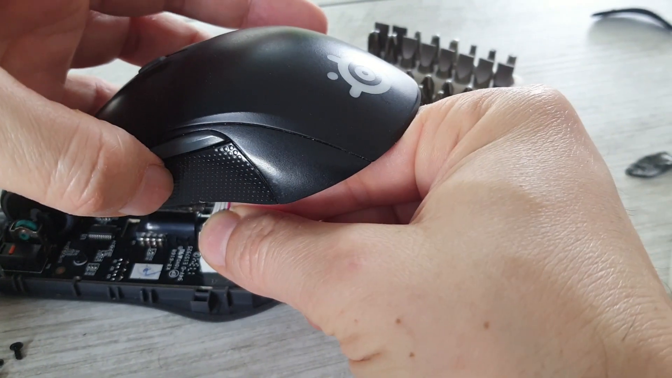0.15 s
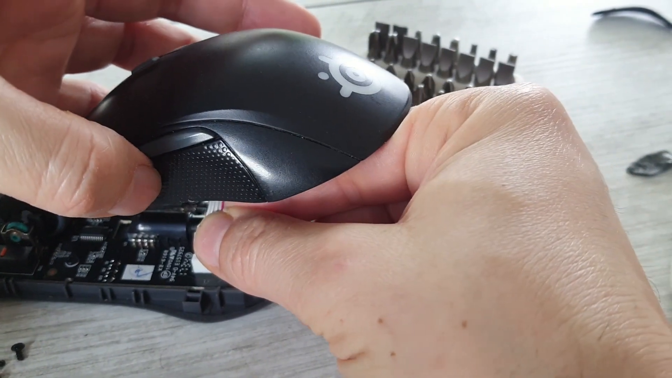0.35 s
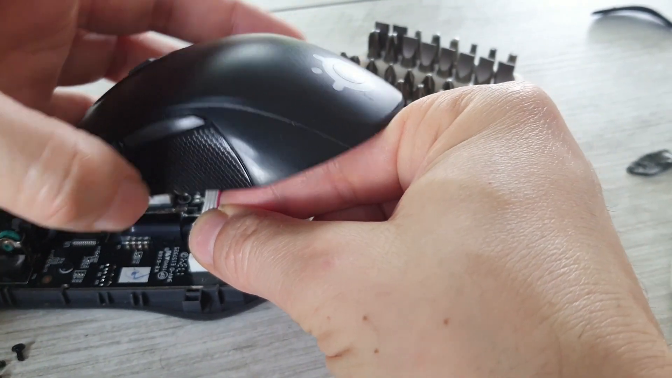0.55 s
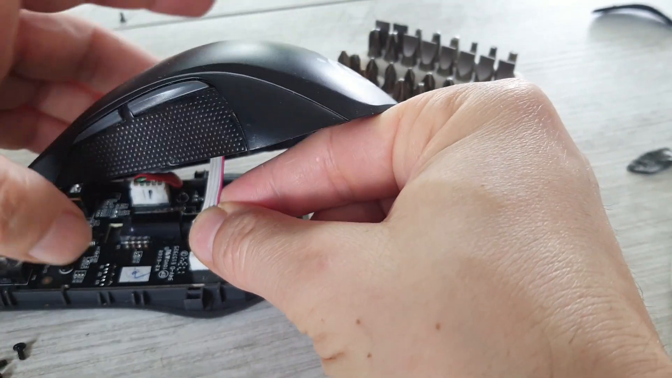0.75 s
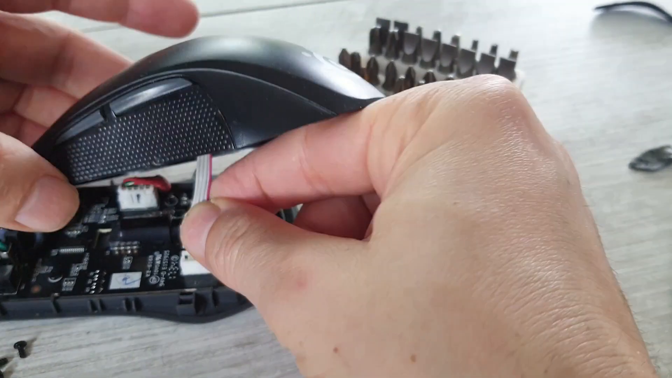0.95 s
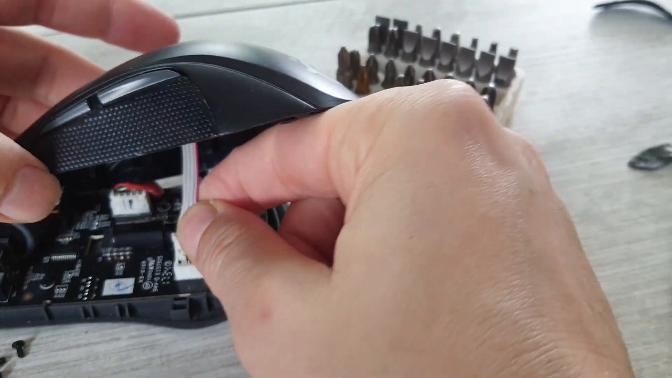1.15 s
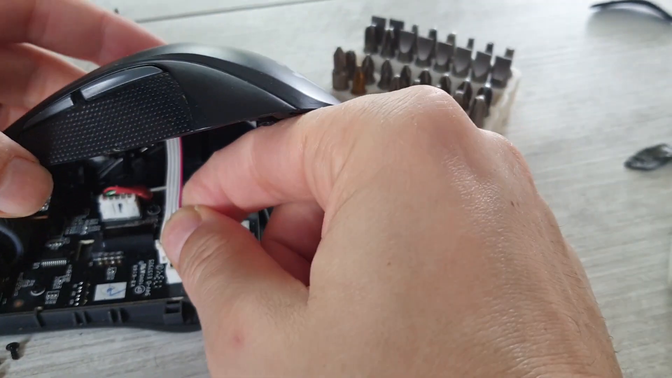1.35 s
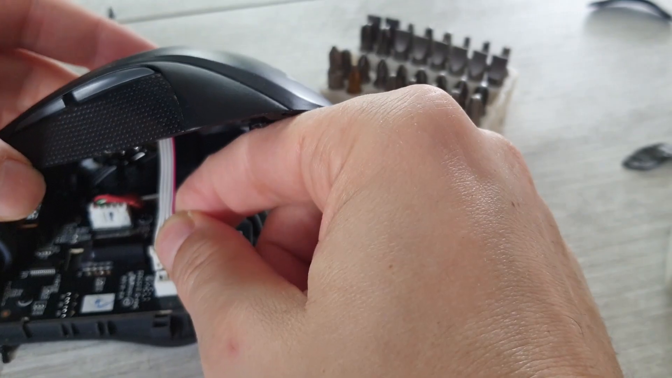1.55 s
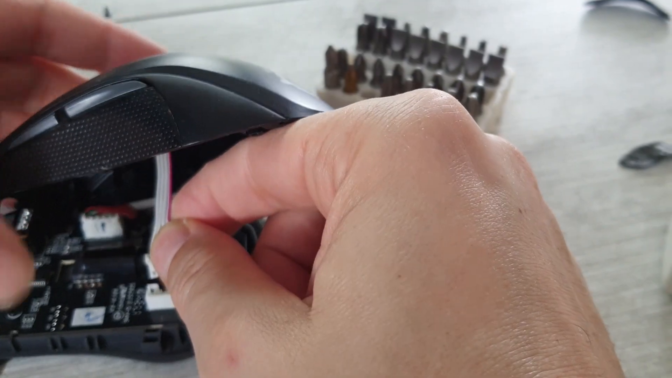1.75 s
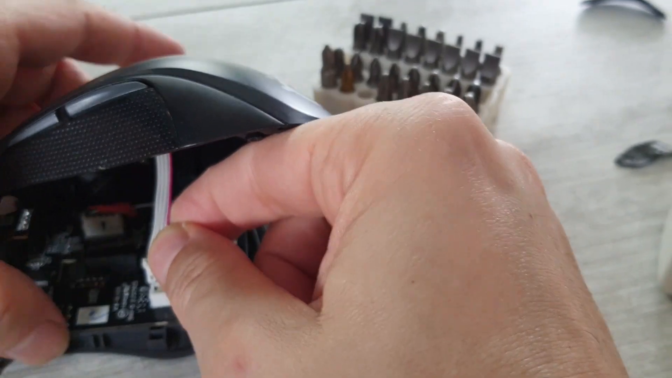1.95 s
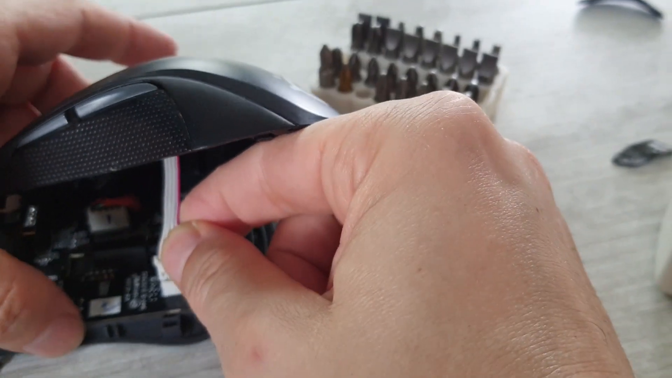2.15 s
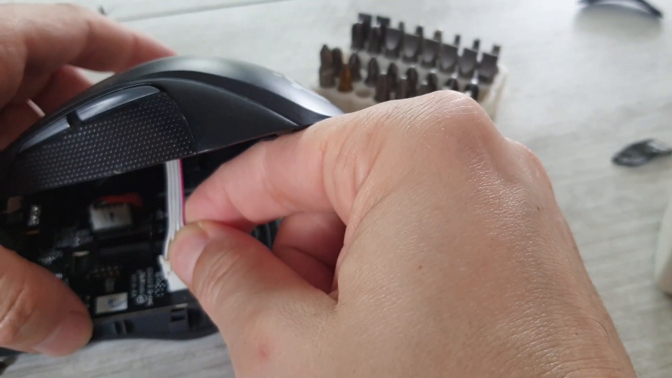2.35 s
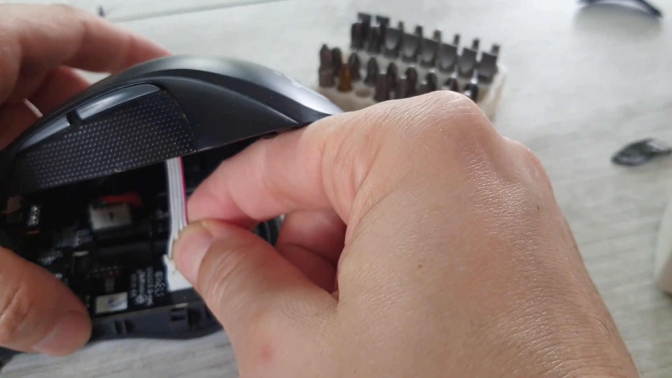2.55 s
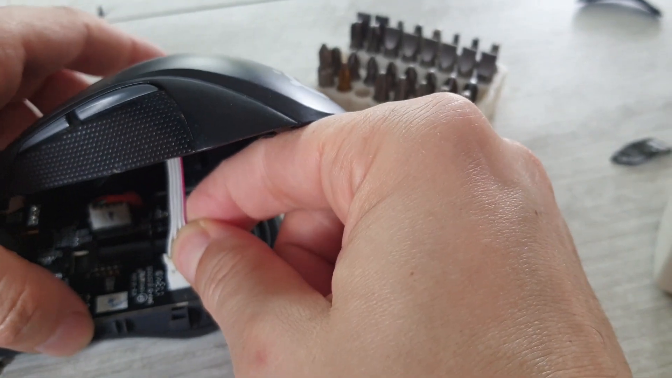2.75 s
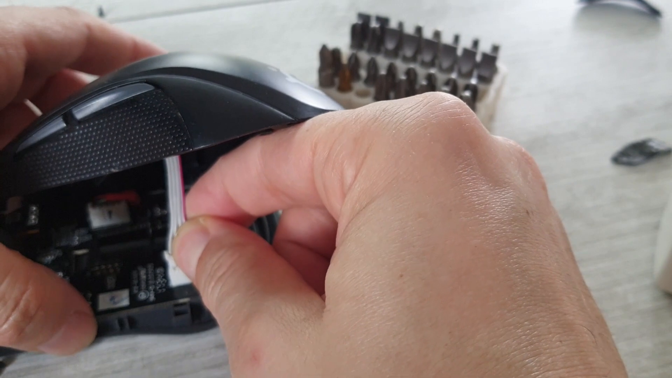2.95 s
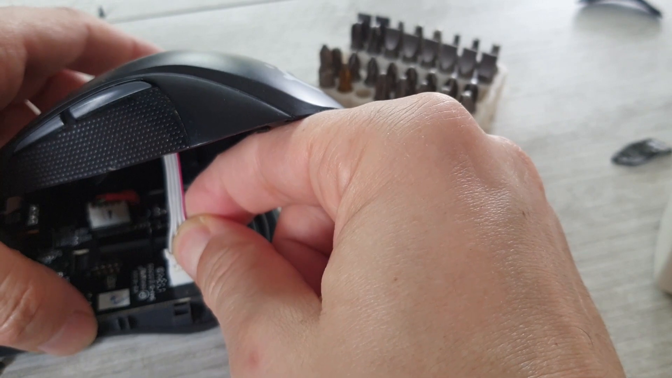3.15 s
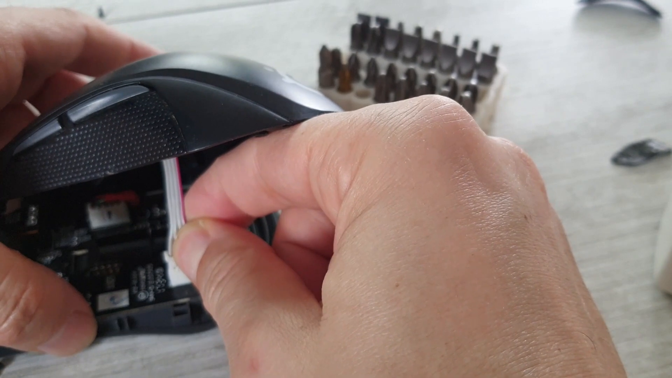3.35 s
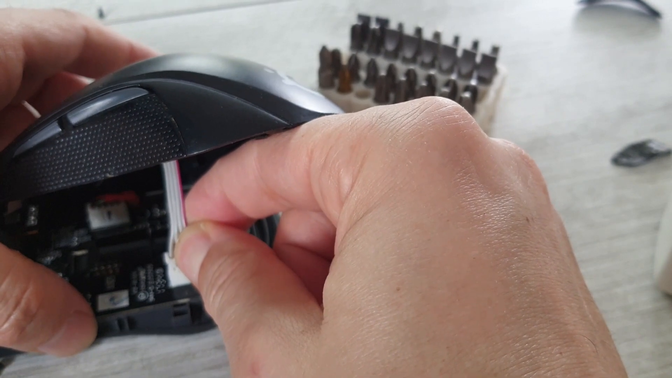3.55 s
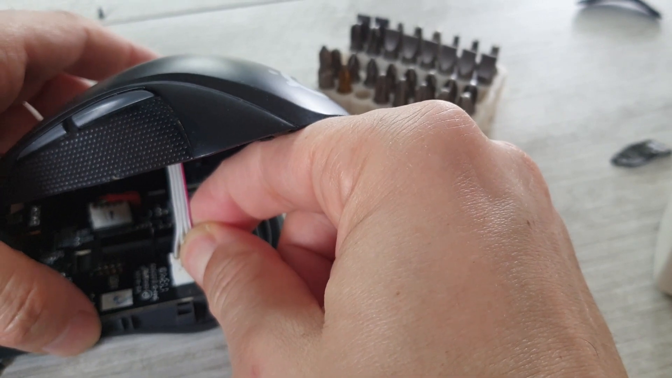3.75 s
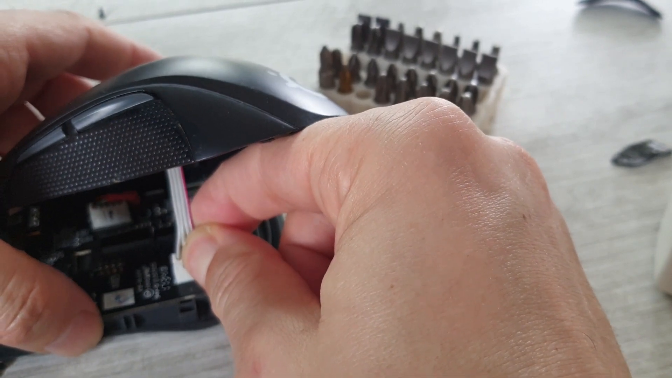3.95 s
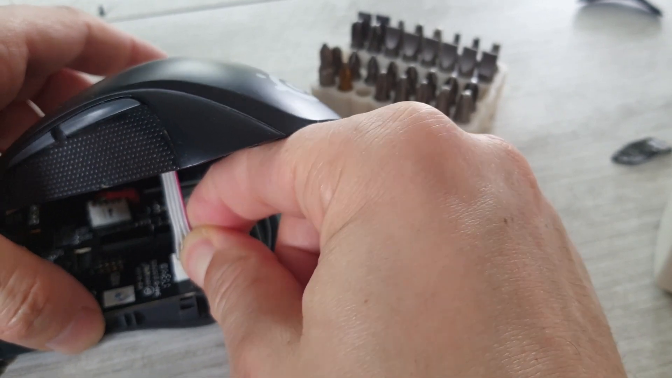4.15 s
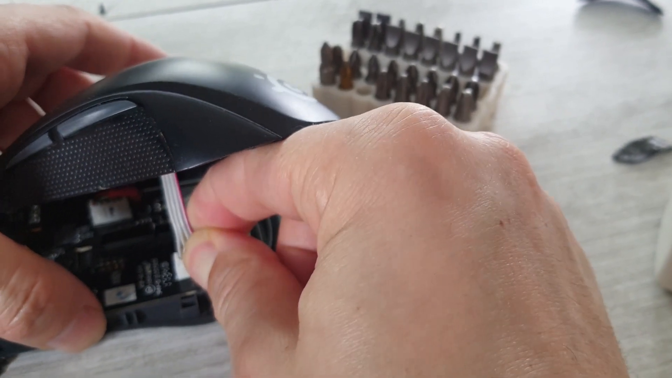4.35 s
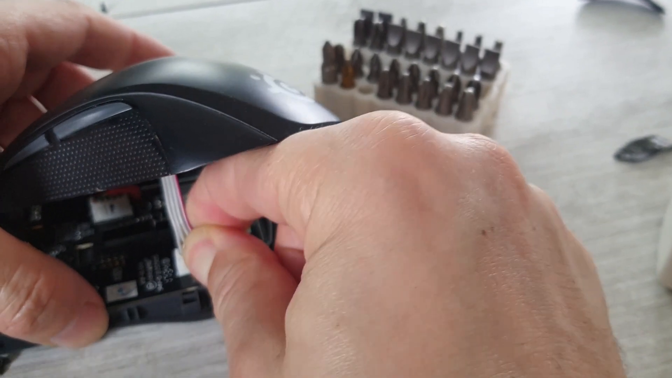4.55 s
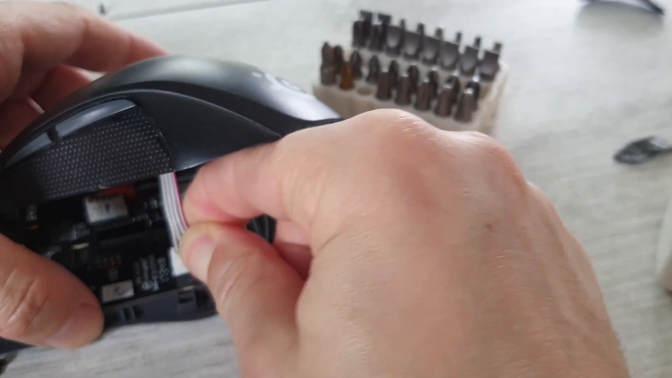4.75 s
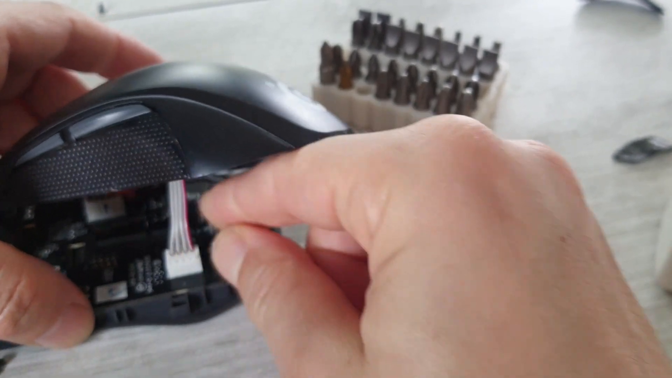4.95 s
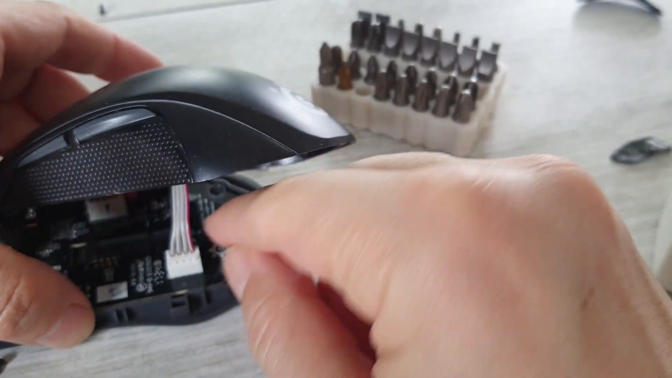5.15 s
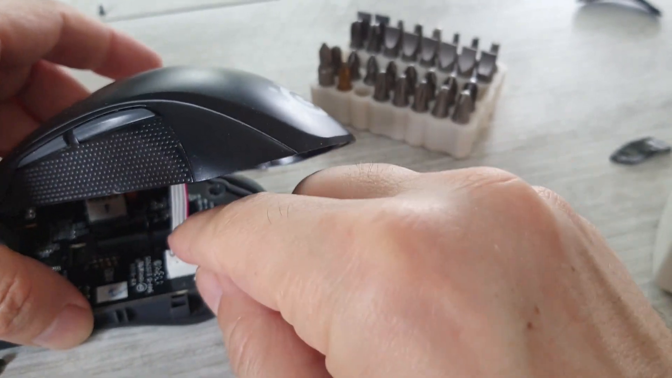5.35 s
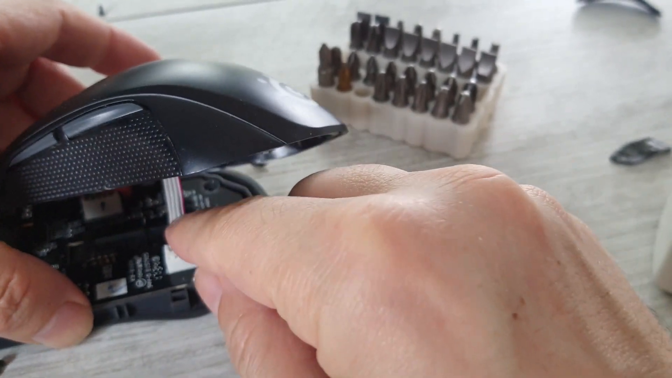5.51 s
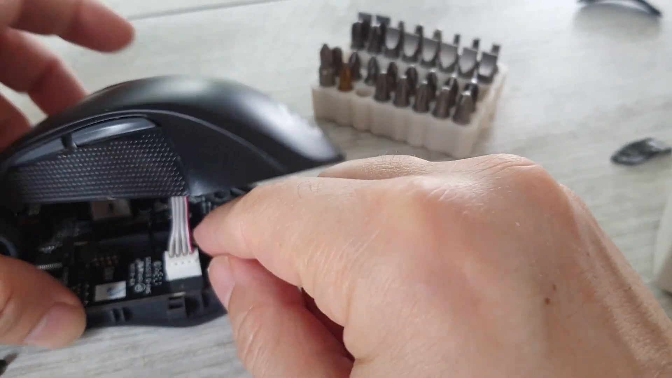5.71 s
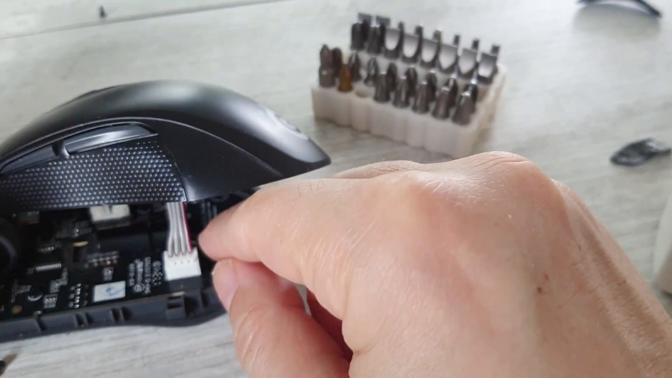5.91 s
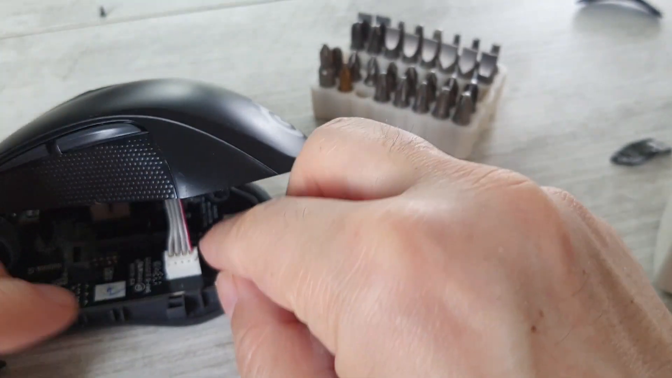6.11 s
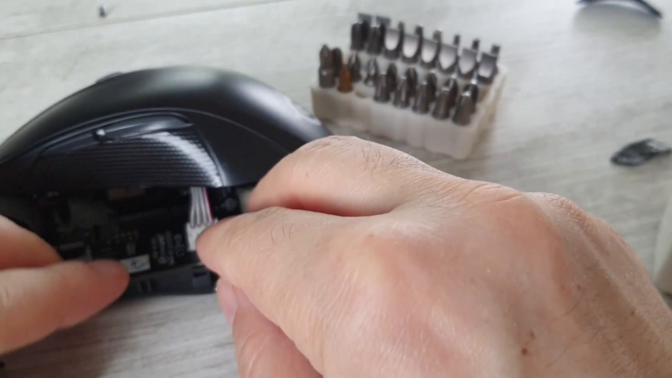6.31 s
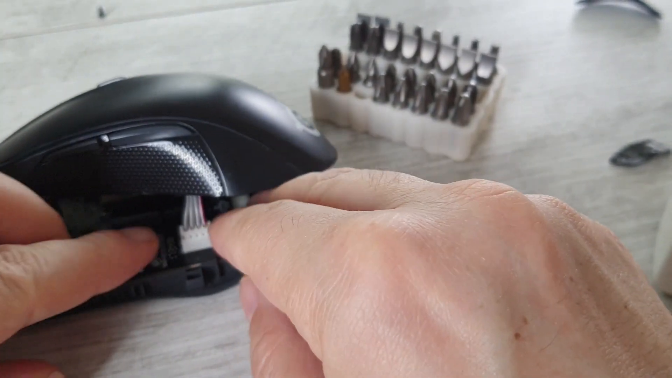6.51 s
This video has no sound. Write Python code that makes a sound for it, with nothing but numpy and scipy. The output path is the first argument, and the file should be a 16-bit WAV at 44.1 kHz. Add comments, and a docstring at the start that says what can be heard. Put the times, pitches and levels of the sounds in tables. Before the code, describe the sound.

Light hollow plastic clicks and taps of a mouse shell being handled on a desk, sparse at first, ending in a loud sharp clatter.

```python
"""Plugging a cable into an opened computer mouse

Fingers press a cable plug into an opened plastic mouse on a wooden desk, close to a camera.
The shell taps on its base: bursts of tiny impacts ring the plastic, its hollows and the desk, and edges tick.
Skin rubs the plastic as coloured noise, the shell scrapes, and the desk thuds, hums and rumbles.
Near the end the hand lands and the parts clatter. Soft noise makes the quiet room tone and hiss behind."""
import sys
import numpy as np
from scipy import signal
from scipy.fft import rfft, irfft, next_fast_len
from scipy.io import wavfile
from scipy.ndimage import uniform_filter1d, map_coordinates

SR = 44100
rng = np.random.default_rng(int(sys.argv[2]) if len(sys.argv) > 2 else 0)


def int16_out(signal):
    """Quantize to a 16-bit WAV file."""
    q = np.round(np.clip(np.atleast_2d(signal).T, -1, 1) * 32767)
    wavfile.write(sys.argv[1], SR, q.astype(np.int16))


N = 294386  # length in samples
STEADY_TOP_HZ = 15800  # skin rub and room tone stop here


def amp(db):
    """Turn decibels into gain."""
    return 10 ** (np.asarray(db) / 20)


def unit(x):
    """Scale a sound to an rms of 1."""
    return x / np.sqrt(np.mean(x ** 2) + 1e-20)


def along(points, hz):
    """Read a value between (frequency, value) points on a log frequency axis."""
    f, value = np.transpose(points)
    return np.interp(np.log(hz + 1), np.log(f + 1), value)


def curve(rows):
    """Join (time, value) points with straight lines, one value per sample."""
    return np.interp(np.arange(N) / SR, *np.transpose(rows))


def wobble(rate):
    """A smooth random curve with this many random points a second."""
    points = rng.standard_normal(int(N * rate / SR) + 4)
    return map_coordinates(points, [np.arange(N) * rate / SR])


def filtered(x, response):
    """Multiply the spectrum of x by a response, which may be complex."""
    m = next_fast_len(N + SR // 2)
    hz = np.fft.rfftfreq(m, 1 / SR)
    return irfft(rfft(x, m) * response(hz), m)[..., :N]


def white():
    """Plain random noise, one channel."""
    return rng.standard_normal(N)


def noise(spectrum):
    """Noise coloured by a spectrum, with an rms of 1."""
    return unit(filtered(white(), lambda hz: amp(along(spectrum, hz))))


def body(modes):
    """An object rings at several resonances, added with alternating sign."""
    def response(f):
        total = 0
        for k, (centre, width, db) in enumerate(modes):
            damping = 1j * f * width
            total = total + (-1) ** k * amp(db) * damping / (centre ** 2 - f ** 2 + damping)
        return total
    return response


# resonances of the shell's edges: (frequency [Hz], width [Hz], relative level [dB])
EDGE_MODES = [(3110, 230, 7.5), (3890, 58, 10.5), (4380, 330, 6), (7130, 980, 2.5), (8700, 900, -2),
              (11870, 4200, -5.5)]
# resonances of the shell's walls: (frequency [Hz], width [Hz], relative level [dB])
WALL_MODES = [(1060, 170, -5), (1280, 170, -4), (1515, 130, 0), (1740, 150, -4), (1910, 130, -2),
              (2450, 300, -9)]
# resonances of the upper shell hollow: (frequency [Hz], width [Hz], relative level [dB])
UPPER_MODES = [(548, 71, -11.5), (606.5, 51.5, -4.5), (668, 120, -13)]
# resonances of the lower shell hollow: (frequency [Hz], width [Hz], relative level [dB])
LOWER_MODES = [(236, 129, -5.5), (324.5, 40, 9), (398, 31, -9.5)]
# resonances of the desk under a blow: (frequency [Hz], width [Hz], relative level [dB])
DESK_MODES = [(73.7, 20.2, 0.5), (124.3, 21.3, 4.5), (163, 68, -8)]
# size of the first blow against the chatter: one ratio each for edges, walls, upper, lower hollow, desk
FIRST_BLOW = [0.19, 0.51, 0.82, .7, 1.66]


def chattering_blows(blows, spiky_db=7, apart=.8):
    """A blow, then a dying chatter of tiny impacts, makes the edges, walls, hollows and desk ring."""
    out = np.zeros((2, N + SR))
    t = np.arange(2 ** 13) / SR
    hz = np.fft.rfftfreq(len(t), 1 / SR)
    all_modes = (EDGE_MODES, WALL_MODES, UPPER_MODES, LOWER_MODES, DESK_MODES)
    bodies = np.array([body(modes)(hz) for modes in all_modes])
    for start, gains, length in blows:
        fade = np.exp(-(t / np.clip(length, .001, .05)) ** 1.5)
        rise = 1 - np.exp(-t / (0.059 * length))  # a long chatter starts softly
        impacts = amp(spiky_db * rng.standard_normal(len(t))) * rise * fade
        shared = rng.standard_normal((5, 1, len(t)))
        own = rng.standard_normal((2, len(t)))
        chatter = np.repeat(shared, 2, axis=1)
        chatter[0] += apart * own  # edges rattle at many points, so the two ports hear them differently
        chatter *= impacts / np.linalg.norm(impacts)
        chatter[..., 0] += np.array(FIRST_BLOW)[:, None]
        rings = irfft(rfft(chatter) * bodies[:, None], len(t))
        peaks = np.abs(rings).max(axis=(1, 2))
        rings *= (gains / peaks)[:, None, None]
        first = round(start * SR)
        out[:, first:first + len(t)] += rings.sum(axis=0)
    return out[:, :N]


def snaps(touches, cycles=6, lag=90):
    """Each touch gives a rough, high-pitched snap, 90 samples late, that dies within a few cycles."""
    out = np.zeros((2, N + SR))
    t = np.arange(2 ** 13) / SR
    for start, db, pitch_hz in touches:
        rough = uniform_filter1d(rng.standard_normal((2, len(t))), size=4)  # spreads it around its pitch
        snap = np.sin(2 * np.pi * pitch_hz * t) * (1 + 2.88 * rough)
        snap *= amp(db) * np.exp(-t * pitch_hz / cycles)
        first = round(start * SR)
        out[:, first:first + len(t)] += np.roll(snap, lag, axis=1)
    return out[:, :N]


# the shell knocks on its base: (time [s], peak level in the lower hollow [dB],
# upper hollow over that [dB], edge rattle over that [dB], chatter length [s])
KNOCKS = [(0.604, -62, -12, 8, 0.03), (0.62, -35.5, -10, -1.5, 0.015), (0.6384, -28.5, -13.5, -9.5, 0.014),
          (.645, -41, -14, -4, 0.039), (.832, -50, -9, -3, 0.019), (0.842, -54.5, -5, 8.5, .027),
          (0.865, -40, -14, -4.5, 0.011), (.896, -44.5, -8.5, -7.5, 0.04), (.963, -43, -0.5, -22, 0.014),
          (1.0788, -33, -9, -6.5, 0.023), (1.1165, -35, -19, -14, 0.064), (1.148, -44.5, -23, -2, 0.065),
          (1.6316, -31.5, -10.5, -20.5, 0.021), (1.708, -35, -33, -14.5, 0.028),
          (1.72, -34.5, -10.5, -22, 0.038), (1.8958, -31, -13, -30, .011), (1.902, -38, 3, -7, 0.012),
          (1.913, -41.5, 9, -24, 0.0057), (1.9173, -44, 5, -23, 0.048), (1.936, -42.5, 3, -6, 0.041),
          (1.9865, -43.5, 2.5, -11, 0.0098), (2.038, -43, -4, -22, 0.026), (2.169, -40.5, -6.5, -14, 0.034),
          (2.1985, -38, -6, -34, 0.027), (3.04, -64, 4, 10, 0.015), (3.071, -55.5, 2.5, -2, 0.054),
          (3.682, -42.5, -1, -17, 0.027), (3.818, -57.5, 1.5, -7, 0.014), (3.8968, -43, 0.5, -9, 0.0073),
          (3.904, -46.5, -3, -21, 0.045), (3.922, -45, -5.5, -14, 0.037), (4.0464, -55, -3, -3, 0.013),
          (4.087, -50.5, -17, -3.5, 0.066), (4.14, -45.5, -24, -13, 0.033), (4.3284, -53.5, -10, -5, 0.027),
          (4.666, -54.5, 0, -3, 0.044), (4.74, -47, -22, -30, 0.048), (4.816, -45.5, -10, -5, 0.047),
          (4.845, -31, -7, -12, 0.015), (4.893, -40.5, -6, -12, 0.072), (5.0096, -49.5, -3.5, -8, 0.02),
          (5.577, -75, -6, -4, .03), (5.613, -58, -7, 4, 0.021), (5.6467, -29, -24, -15.5, 0.027),
          (5.7422, -25, -11, -31, 0.018), (5.7667, -35, -9, -10, .015), (5.802, -34, -26, -23, .021),
          (5.828, -36, -24, -18, 0.023), (5.911, -42.5, 0, 12.5, 0.036), (6.107, -59, 11, -10, 0.0095),
          (6.1645, -30, -6, -4, 0.02), (6.1974, -21.5, 3.5, 2.5, .015), (6.211, -25.5, 3, 8, 0.016),
          (6.2803, -24.5, -3, -7.5, 0.022), (6.3055, -21, -0.5, 9, .021), (6.319, -37, 9.5, -13, 0.01),
          (6.3277, -20, -6.5, -26, 0.025), (6.4044, -20, 5.5, 7.5, .0081), (6.4103, -36.5, 7, 24.5, 0.011),
          (6.4398, -30.5, -8, 1.5, 0.029), (6.47, -47, -10, 9, .045), (6.514, -35, -2, -10, 0.013),
          (6.53, -33, -3.5, -3, 0.023), (6.6347, -49.5, 15.5, 19, 0.01), (6.657, -36.5, 2.5, -13, 0.033)]
WALL_DB, WALL_FROM_DB = -45.5, -41.5  # wall ring when edges and upper hollow average the second level
WALL_GROWS = 1.25  # dB of wall ring gained per dB of that average
SNAP_DB, SNAP_HZ = -7, 3674  # snap over the edge rattle, and its pitch
KNOCK_THUD_DB = -11  # desk over the lower hollow


def shell_knocks():
    """The hollow shell hits its base: a bright snap and a chatter that rings every part."""
    blows, touches = [], []
    for start, lower_db, upper_over_db, edge_over_db, length in KNOCKS:
        edge_db = lower_db + edge_over_db
        upper_db = lower_db + upper_over_db
        wall_db = WALL_DB + WALL_GROWS * ((edge_db + upper_db) / 2 - WALL_FROM_DB)
        desk_db = lower_db + KNOCK_THUD_DB
        blows.append((start, amp([edge_db, wall_db, upper_db, lower_db, desk_db]), length))
        touches.append((start, edge_db + SNAP_DB, SNAP_HZ))
    return chattering_blows(blows) + snaps(touches)


# extra wall ring where knocks catch the side wall: (time [s], peak level [dB], chatter length [s])
WALL_RING = [(1.078, -45.5, 0.036), (1.63, -49, 0.037), (1.9173, -53, 0.025), (3.902, -44.5, 0.0063),
             (4.0466, -43, 0.01), (4.097, -53, 0.056), (4.137, -58, .031), (4.331, -58, 0.016),
             (4.664, -45.5, 0.033), (4.888, -51, 0.031), (5.008, -51, 0.012), (5.641, -46, 0.02),
             (5.914, -31.5, 0.017), (6.2818, -24.5, 0.017), (6.3154, -15, 0.014), (6.4034, -7, 0.0062),
             (6.526, -28.5, .02), (6.6318, -24, 0.0096), (6.658, -38, .018)]


def extra_wall_ring():
    """Some knocks catch the side wall, which adds more wall ring."""
    walls = np.array([0, 1, 0, 0, 0])
    return chattering_blows([(start, amp(db) * walls, length) for start, db, length in WALL_RING])


# sharp edge ticks, most of them within a knock: (time [s], level before roughness [dB], pitch [Hz])
TICKS = [(.12, -62, 8000), (.4648, -52, 8300), (.602, -49, 6700), (1.902, -32, 7800), (1.9128, -34, 6100),
         (2.1996, -51.5, 4540), (3.073, -47.5, 4510), (3.682, -46, 6970), (3.9242, -51.5, 5000),
         (4.0478, -39.5, 8550), (4.092, -48.5, 5660), (4.141, -55, 5540), (4.5155, -57.5, 3670),
         (4.5155, -58, 10000), (4.8458, -29, 11300), (4.8452, -29, 5070), (5.34, -65.5, 4450),
         (5.577, -57, 4500), (6.1028, -37.5, 4000), (6.2818, -30, 3740), (6.3174, -18.5, 3900),
         (6.3255, -20.5, 3460)]


def edge_ticks():
    """Plastic edges add sharp ticks, most of them within a knock."""
    return snaps(TICKS)


# low thuds that heavier knocks add: (time [s], peak level [dB], chatter length [s])
THUDS = [(.602, -43, 0.022), (.6395, -41, 0.032), (1.9874, -42, 0.015), (3.819, -46.5, 0.02),
         (4.092, -34, 0.046), (4.141, -37, 0.022), (4.5155, -39.5, 0.05), (4.7384, -38, 0.054),
         (5.7464, -23.5, 0.021), (5.7625, -17, .026), (5.798, -22, 0.031), (5.8283, -24, 0.042),
         (5.91, -30.5, 0.02), (6.1651, -30.5, 0.032), (6.21, -30, 0.016), (6.2818, -25, 0.017),
         (6.3055, -26, 0.019), (6.3255, -23, 0.03), (6.4097, -22.5, 0.013)]


def desk_thuds():
    """Heavier knocks add a low thud from the desk's resonances."""
    desk = np.array([0, 0, 0, 0, 1])
    return chattering_blows([(start, amp(db) * desk, length) for start, db, length in THUDS])


# how strongly skin rubs the plastic: (time [s], level [dB])
RUB = [(0, -82), (.8, -80), (.88, -73), (1.06, -69), (1.15, -61), (1.24, -82), (1.55, -78.5), (1.74, -68.5),
       (1.86, -72), (1.97, -66), (2.08, -81), (3.59, -87), (4.05, -79.5), (4.33, -87.5), (4.49, -86.5),
       (4.57, -67.5), (4.72, -84), (4.79, -69.5), (4.87, -57.5), (4.96, -61.5), (5.18, -69.5), (5.23, -79),
       (5.4, -89), (5.54, -72), (5.8, -47), (5.93, -45), (6.15, -57.5), (6.3, -44.5), (6.4, -45.5),
       (6.51, -45), (6.6, -59.5), (6.68, -61)]
# treble of the rub over its body, for a light touch: (time [s], level [dB])
BRIGHT = [(0, 2), (.6, 12), (1.06, 5), (1.3, 3), (2, 5), (3, -0.5), (4.05, 7), (4.4, 5.5), (4.58, 12),
          (4.7, 2), (4.87, 6), (5.3, 11), (5.65, -1), (5.9, 9), (6.35, 3), (6.55, -28), (6.68, -16)]
# colour of the skin noise: (frequency [Hz], relative level per Hz [dB])
SKIN = [(410, 0), (700, -8), (1350, -4), (1520, -5.5), (2880, -3), (3550, -2.5), (5400, -2.5), (9860, -6.5),
        (13000, -9), (16000, -6)]
LIGHT_RUB_DB = -80  # level of a light rub
DULLS = 0.35  # dB of treble lost per dB of rubbing
BRIGHT_HZ = 7000  # the treble begins around here


def skin_rub():
    """Skin hisses on plastic in uneven grains, and pressing harder makes it duller."""
    rub_db = curve(RUB)
    bright_db = curve(BRIGHT) - DULLS * (rub_db - LIGHT_RUB_DB)
    grain = amp(.9 * wobble(25) + 1.1 * wobble(300))
    shared, left, right = noise(SKIN), noise(SKIN), noise(SKIN)
    skin = grain * (shared + 10.6 * np.array([left, right]))
    dull = filtered(skin, lambda hz: 1 / (1 + (hz / BRIGHT_HZ) ** 4))
    treble = skin - dull
    rub = amp(rub_db) * (unit(dull) + amp(bright_db) * unit(treble))
    return filtered(rub, lambda hz: hz < STEADY_TOP_HZ)


SCRAPE_DB, SCRAPE_GROWS = -71.5, 0.47  # level at a light rub before wobble; dB gained per dB of rubbing


def shell_scrape():
    """The shell scrapes along with the rub: noise rings in its two hollows."""
    scrape_db = SCRAPE_DB + SCRAPE_GROWS * (curve(RUB) - LIGHT_RUB_DB)
    scrape = unit(filtered(white(), body(LOWER_MODES + UPPER_MODES)))
    return amp(scrape_db + 4.6 * wobble(30)) * scrape


# resonances of the desk top: (frequency [Hz], width [Hz], relative level [dB])
DESK_TOP_MODES = [(179.8, 34.6, 4), (244, 123, -8)]
# desk top hum, before its wobble: (time [s], level [dB])
HUM = [(0, -64.5), (.33, -55), (.54, -50.5), (.74, -58), (1.06, -57.5), (1.3, -70.5), (1.95, -59),
       (2.27, -66), (3, -64), (3.59, -71.5), (4.05, -61), (4.4, -63.5), (4.72, -60), (4.96, -65),
       (5.65, -70), (5.84, -37.5), (5.93, -53), (6.15, -70), (6.24, -36), (6.4, -47), (6.6, -66),
       (6.68, -69)]


def desk_hum():
    """The desk top hums: noise passes through its resonances and slowly wavers."""
    hum = unit(filtered(white(), body(DESK_TOP_MODES)))
    return amp(curve(HUM) + 4.0 * wobble(3.216)) * hum


# hands shifting on the desk, rumble shared by both sides before its swell: (time [s], level [dB])
LEAN = [(0, -53), (.33, -49), (.54, -46.5), (.74, -53.5), (1.24, -53.5), (1.86, -54.5), (2.03, -47.5),
        (2.27, -55.5), (3.59, -53.5), (4.05, -47.5), (4.33, -53.5), (4.8, -48), (5.17, -54.5),
        (5.54, -54.5), (5.82, -38.5), (5.93, -48), (6.15, -47.5), (6.24, -32), (6.36, -40), (6.6, -58),
        (6.68, -48)]
# colour of the rumble: (frequency [Hz], relative level per Hz [dB])
RUMBLE = [(15, -47), (25, -4), (59, 1), (129, -8.5), (150, -21), (160, -7.5), (210, -45), (350, -120)]


def desk_rumble():
    """Shifting hands make the desk rumble: deep, swelling noise, mostly alike on both sides."""
    swell = amp(2 * wobble(14))
    shared = noise(RUMBLE)
    own = np.array([noise(RUMBLE), noise(RUMBLE)])
    return amp(curve(LEAN)) * swell * (shared + .35 * own)


# time the room takes to fall by 60 dB: (frequency [Hz], time [s])
ROOM = [(100, 0.79), (500, 0.56), (2000, 0.25), (5000, 0.25), (12000, 0.17)]
# strength of the echo: (frequency [Hz], level [dB])
ROOM_DB = [(60, -8.5), (300, -13.5), (700, -13), (2000, -5), (3000, -10.5), (4500, -4.5), (5600, -10.5),
           (12000, -6.5)]


def room_echo(x):
    """The room answers with a noise tail in which each frequency dies at its own speed."""
    hz, t, z = signal.stft(rng.standard_normal((2, SR // 2)), SR, nperseg=256)
    fade = amp(-60 * t / along(ROOM, hz)[:, None])
    tail = signal.istft(z * fade, SR, nperseg=256)[1]
    echo = signal.fftconvolve(x, tail / np.linalg.norm(tail[0]), axes=1)[:, :N]
    return filtered(echo, lambda f: amp(along(ROOM_DB, f)))


# left port over right port: (frequency [Hz], level [dB])
PORTS = [(40, -5), (300, -4.5), (700, -2), (1400, -3), (2800, 1.5), (6000, .5), (14000, 4.5)]
LEAD_S = 0.000226  # the left port hears the desk this much earlier


def at_ports(x):
    """Sound from the desk reaches the two microphone ports at different times and strengths."""
    side = np.array([[.5], [-.5]])

    def response(hz):
        gain = amp(side * along(PORTS, hz))
        shift = np.exp(2j * np.pi * hz * LEAD_S * side)
        return gain * shift
    return filtered(x, response)


# colour of the room tone and hiss: (frequency [Hz], relative level per Hz [dB])
AIR = [(88, -41), (150, 0.5), (193, -8), (422, -10), (504, -9), (790, -18.5), (1240, -18), (1980, -23.5),
       (9440, -45), (15100, -30), (16000, -30.5)]
# how alike left and right are: (frequency [Hz], likeness from 0 to 1)
AIR_ALIKE = [(60, 1), (290, 0.33), (640, 0.13), (1400, .0), (15000, 0.052)]
AIR_DB = -67.5  # level before its slow wobble


def air():
    """Room tone and microphone hiss are noise, alike in the bass and nearly unrelated in the treble."""
    def mid_side(hz):
        turn = np.arccos(np.clip(along(AIR_ALIKE, hz), -1, 1)) / 2
        return (hz < STEADY_TOP_HZ) * np.array([np.cos(turn), np.sin(turn)])
    pair = np.array([noise(AIR), noise(AIR)])
    mid, side = filtered(pair, mid_side)
    return amp(AIR_DB + 0.81 * wobble(4.48)) * np.array([mid + side, mid - side])


def scene():
    """Add the contacts, their echo, the handling sounds and the room tone."""
    taps = shell_knocks() + extra_wall_ring() + edge_ticks() + desk_thuds()
    handling = skin_rub() + shell_scrape() + desk_hum() + desk_rumble()
    return at_ports(taps + handling + room_echo(taps)) + air()


BASS_CUT_HZ, TOP_HZ = 40, 16000


def record(dry):
    """The camera cuts the deepest bass and falls off steeply above its top frequency."""
    def response(hz):
        bass_cut = (1j * hz / (BASS_CUT_HZ + 1j * hz)) ** 4
        top_cut = 1 / (1 + (hz / TOP_HZ) ** 120)
        return bass_cut * top_cut
    return filtered(dry, response)


dry = scene()
out = record(dry)
int16_out(out)
```